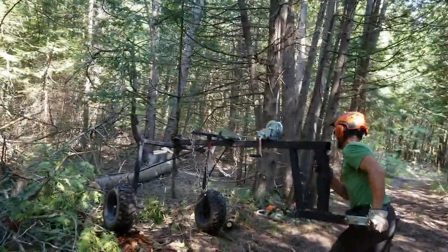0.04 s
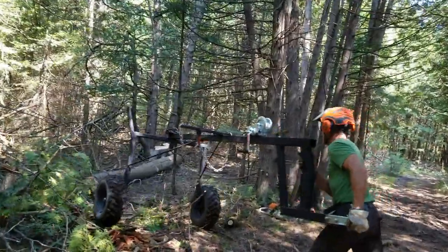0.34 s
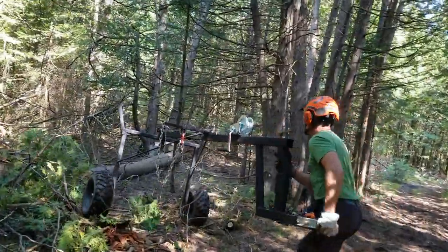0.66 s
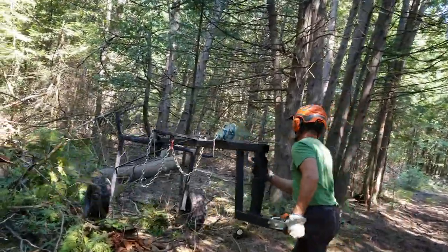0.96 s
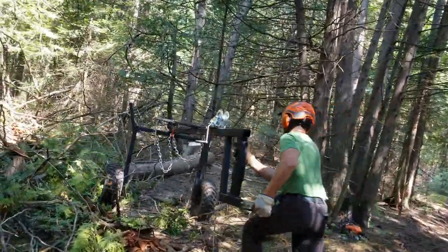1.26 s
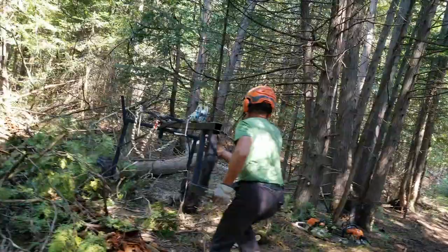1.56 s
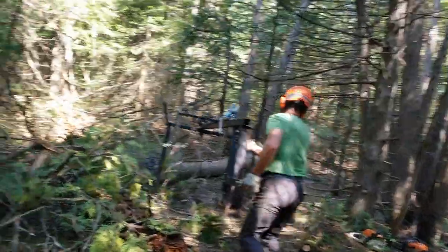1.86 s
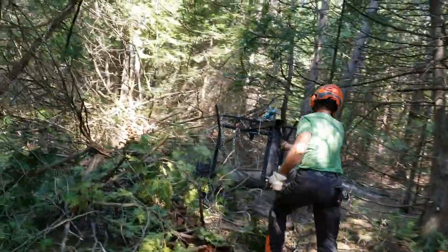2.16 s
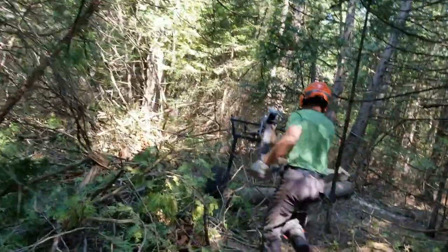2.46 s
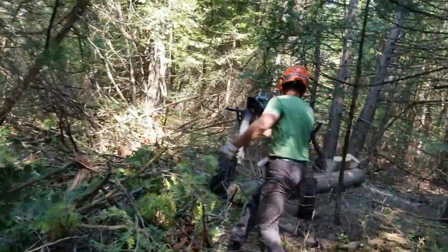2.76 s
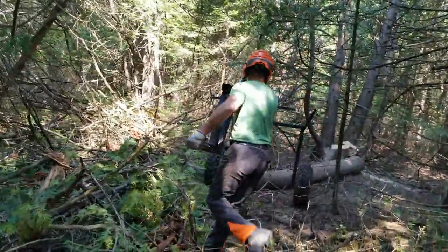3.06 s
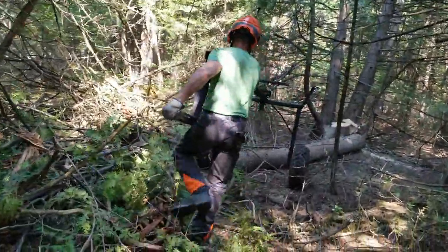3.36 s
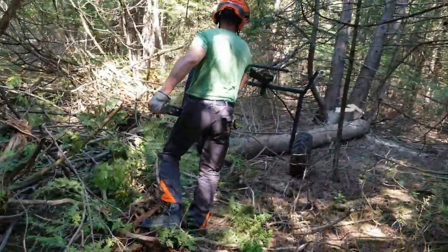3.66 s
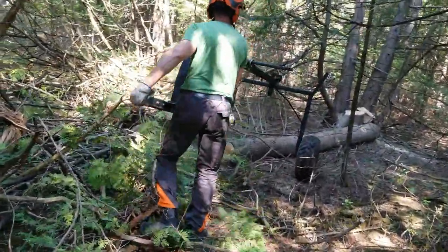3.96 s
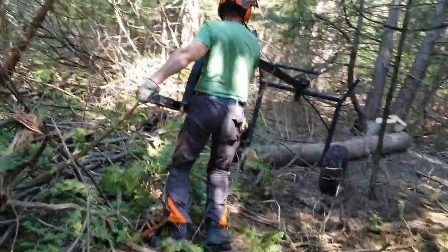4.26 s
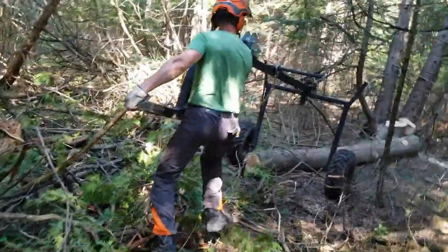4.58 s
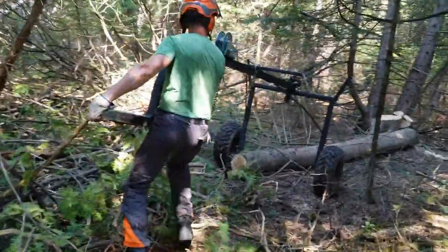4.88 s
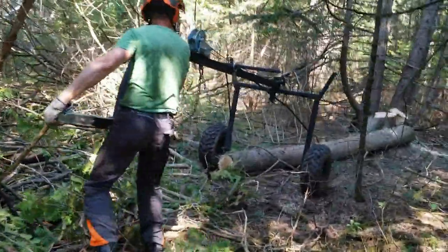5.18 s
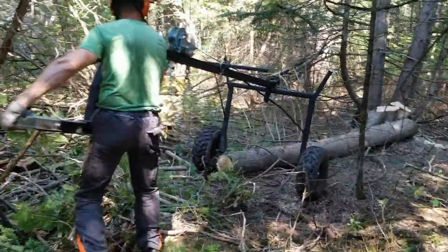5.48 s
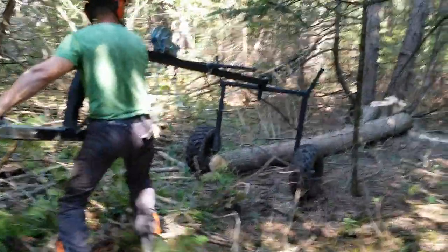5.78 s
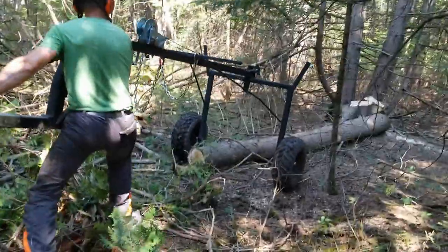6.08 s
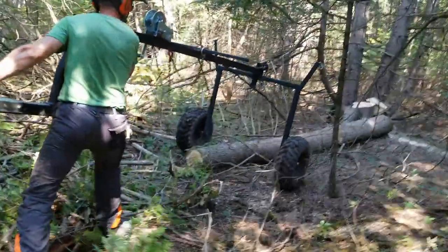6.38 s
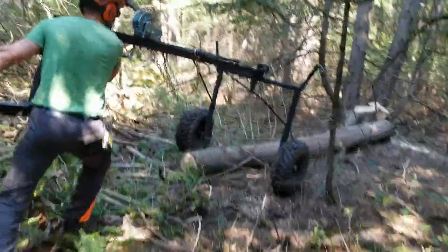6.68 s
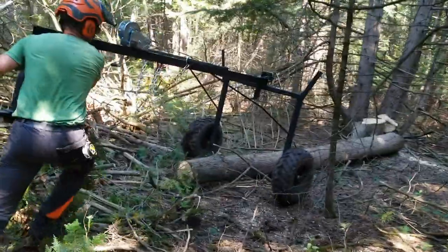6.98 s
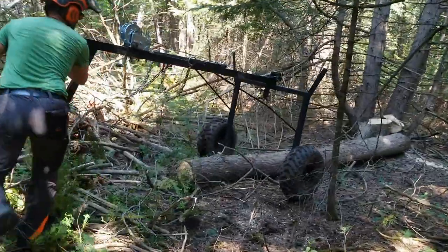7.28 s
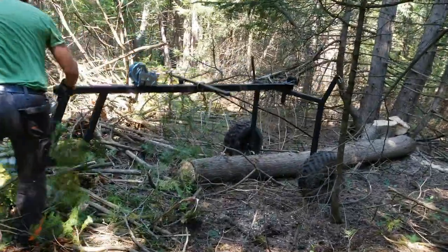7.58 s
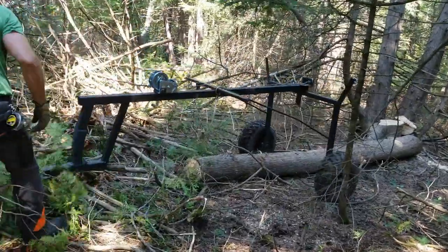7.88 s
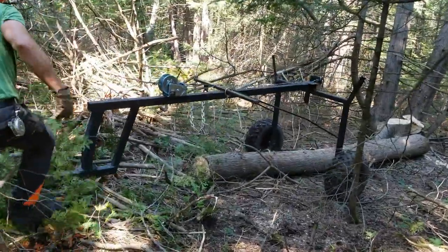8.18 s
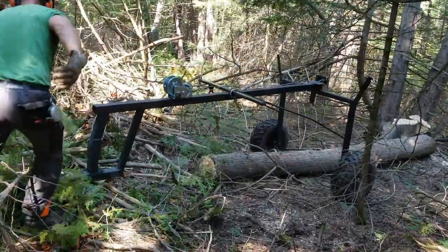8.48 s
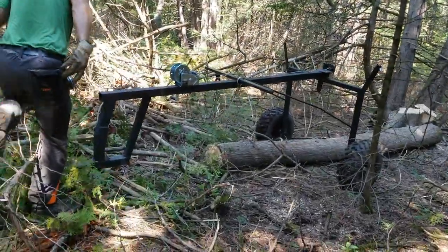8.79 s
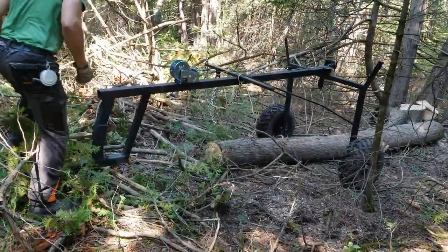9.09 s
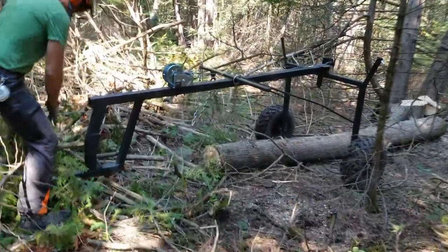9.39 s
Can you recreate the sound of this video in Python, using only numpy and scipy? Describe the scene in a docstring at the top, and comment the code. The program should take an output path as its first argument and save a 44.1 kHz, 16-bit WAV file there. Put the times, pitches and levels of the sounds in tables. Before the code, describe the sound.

A steel log carrier on small tyres is hauled over dry brush a few metres away in a quiet forest. Uneven footsteps rustle and crackle throughout, and the trees give each crack a short, wide echo. For the first two seconds twigs snap sharply over dull thuds, loudest with a wooden knock at about 1.3 seconds. From 2 to 4 seconds loose steel parts clank lightly and a small fitting gives a very high jingle, with a brief scrape over wood at 2.3. A stick creaks faintly at 4 seconds. Quieter steps, small snaps and knocks follow until about 6. Cracking builds again from 6.7, peaking near 7.6 with a wooden knock, a heavy crunch and another short scrape. Light clinks and jingles follow from 8 seconds, with a last few snaps and a clank around 9.

```python
"""A steel log carrier on two small tyres is hauled over dry brush, a few metres away among trees. Twigs snap
and crunch under boots and wheels, steps thud on the soil, and thick wood knocks. Loose parts clank on the
frame, a small steel chain jingles, and the frame scrapes over wood. A bent stick creaks once. The trunks
scatter every crack into a short, wide echo."""
import sys
import numpy as np
from scipy import signal
from scipy.fft import rfft, irfft, next_fast_len
from scipy.io import wavfile

SR = 44100
rng = np.random.default_rng(int(sys.argv[2]) if len(sys.argv) > 2 else 0)


def wrap_up_sound(samples):
    """Save the sound to the file named by the first command line argument, as 16-bit audio."""
    columns = np.atleast_2d(samples).T
    # keep every value between -1 and 1, then stretch to whole-number steps
    tamed = np.clip(columns, -1, 1)
    steps = np.round(tamed * 32767).astype(np.int16)
    wavfile.write(sys.argv[1], SR, steps)


N = 420713
TIME = np.arange(N) / SR
TOP_HZ = 15900  # upper limit of the treble

# Tone of the still air, the dry rustle and the scuffed soil. Each row: frequency in Hz, level in dB.
AIR_TONE = [(25, -4), (80, 0), (300, -21.5), (650, -14), (1700, -19.5), (4500, -12.5), (8300, -21.5),
            (15000, -29.5)]
RUSTLE_TONE = [(400, -19), (800, -5.5), (1700, -3), (2600, 1), (4800, 3.5), (6700, 0), (8300, -13.5),
               (11000, -5), (15500, -13)]
SOIL_TONE = [(30, -25.5), (70, -5.5), (150, 1), (400, -13), (750, -4.5), (1500, -22.5), (3000, -42.5)]
# Steps and heaves on the brush. Each row: moment of full weight in seconds, rustle level in dB,
# soil level in dB, easing-off time in seconds.
BRUSH_STEPS = [(.02, -50.5, -91, 0.034), (0.479, -51, -50.5, 0.069), (1.02, -46.5, -50.5, 0.51),
               (2.197, -46.5, -54.5, 0.26), (2.58, -73, -61, 0.48), (3.079, -51.5, -69.5, 0.21),
               (4.04, -55, -71, 0.082), (4.42, -57, -71, 0.23), (4.931, -42.5, -44.5, 0.03),
               (5.774, -54, -60.5, 0.06), (6.08, -55.5, -53.5, .1), (6.901, -47.5, -57, 0.17),
               (7.6, -37, -43.5, 0.093), (8.233, -44.5, -55.5, 0.042), (8.79, -52, -71, 0.074),
               (9.1, -50.5, -56.5, 0.21)]
# Larger twigs breaking. Each row: start in seconds, level in dB, pitch in Hz,
# breaking time in seconds, share sent to the echo in dB.
TWIG_SNAPS = [(.032, -42, 3240, 0.0013, -7), (.144, -35, 4120, 0.0017, -10),
              (.359, -18.5, 6000, 0.0018, -13.5), (.474, -40, 3230, .012, -27),
              (.599, -23, 6120, 0.00065, -11), (.709, -24, 4460, 0.0047, -10.5),
              (.978, -31, 3600, 0.03, -24), (1.2166, -23, 3490, 0.00098, -6.5),
              (1.259, -24.5, 5340, 0.0018, 3), (1.2815, -14, 3180, 0.0032, -12),
              (1.503, -19, 5550, 0.007, -11.5), (1.793, -29.5, 4100, 0.0051, -13.5),
              (1.822, -30.5, 4330, 0.039, -9), (1.996, -32.5, 4420, 0.0068, -4.5),
              (2.059, -21, 4260, 0.0026, -9.5), (2.293, -35, 3570, 0.042, 4.5),
              (2.324, -31, 4170, .039, -1), (2.618, -44, 3960, 0.00091, -29),
              (2.819, -39, 4260, 0.0016, -11), (4.262, -37.5, 5400, 0.0021, -12),
              (4.556, -42, 2870, .0038, -4.5), (4.728, -41, 2820, 0.0018, -4.5),
              (4.741, -32.5, 3880, 0.0016, -18), (4.94, -32, 5020, 0.0062, -33),
              (5.149, -39.5, 4480, 0.0022, -13), (5.378, -44.5, 4700, 0.0035, -6),
              (6.075, -30, 5000, 0.0072, -7), (6.4475, -34.5, 5080, .0025, -18.5),
              (6.68, -27.5, 4820, .0015, -7), (6.689, -15.5, 4180, 0.0021, -7.5),
              (6.926, -31.5, 5600, 0.0033, -22), (7.016, -38.5, 4500, 0.0046, -3),
              (7.136, -36.5, 4260, 0.0058, -3), (7.261, -25.5, 4950, 0.0016, -9),
              (7.277, -25, 4880, 0.014, -8.5), (7.311, -32, 4100, 0.0049, -5),
              (7.395, -32, 4500, 0.0085, -23), (7.5993, -17.5, 4100, 0.0025, -7),
              (7.61, -14, 4020, 0.0038, -14), (7.75, -23, 4150, .024, -9), (7.799, -28.5, 3780, 0.035, -7),
              (8.991, -26, 4760, 0.032, -7.5), (9.088, -33.5, 3970, .012, -6)]
# Echo of the trees, band by band. Each row: lower edge in Hz, level in dB.
ECHO_BANDS = [(90, -1.5), (400, 0.5), (1000, 0.5), (3200, 5), (5000, 5.5), (7500, 6), (11000, 5.5)]
# Needle-thin twigs parting. Each row: start in seconds, level in dB.
TWIG_TICKS = [(.1275, -43), (.3105, -38.5), (0.382, -34.5), (0.547, -38), (.965, -35.5), (1.066, -35),
              (2.546, -42), (2.696, -43), (2.791, -34.5), (3.3839, -44), (4.342, -49), (4.615, -49.5),
              (4.921, -32.5), (4.961, -54), (5.318, -48.5), (7.24, -32), (7.523, -46), (9.148, -35.5),
              (9.175, -38.5)]
# Loose steel hitting the frame. Each row: start in seconds, level in dB, pitch in Hz,
# rattling time in seconds.
FRAME_CLANKS = [(0.185, -43.5, 4640, .012), (2.112, -32, 4000, .02), (2.975, -35, 4170, 0.014),
                (3.135, -44.5, 4240, 0.033), (3.268, -48, 4380, 0.014), (3.43, -44.5, 4470, 0.016),
                (3.646, -49.5, 5400, 0.0026), (3.8, -35.5, 4180, 0.027), (4.177, -45, 6700, 0.006),
                (5.471, -44, 4880, 0.015), (6.074, -37.5, 4060, 0.01), (6.849, -39.5, 4450, 0.0066),
                (7.897, -39, 4920, 0.011), (7.992, -35, 4520, .011), (8.118, -43.5, 4940, .013),
                (8.268, -34.5, 4100, 0.0035), (8.427, -48.5, 4330, 0.0074), (8.537, -48, 4130, 0.015),
                (9.209, -29.5, 3740, 0.0046)]
# The frame's ringing tones. Each row: pitch in Hz, level in dB, seconds to fade by 60 dB.
FRAME_TONES = [(2260, 1, 0.24), (2467, 2.5, .38), (2645, -0.5, 0.35), (3330, -0.5, 0.15), (3900, -7, .28),
               (4240, -3.5, 0.27), (5160, 1, .18), (5820, -5, 0.23)]
# Thick branches and the log knocking. Each row: start in seconds, peak level in dB, pitch in Hz.
WOOD_KNOCKS = [(.476, -30.5, 834), (.711, -32, 860), (1.215, -19, 914), (1.648, -37, 755),
               (3.182, -39, 660), (3.528, -42.5, 794), (4.477, -37.5, 1230), (4.74, -30, 617),
               (4.874, -39, 420), (4.885, -38, 586), (5.7, -52, 404), (5.756, -40.5, 495),
               (7.529, -22.5, 670), (7.579, -27, 950)]
# Boots and tyres landing on soil. Each row: start in seconds, peak level in dB, pitch in Hz.
SOIL_THUDS = [(.711, -36, 159), (.881, -32.5, 155), (1.221, -32.5, 97), (1.284, -28.5, 210),
              (1.655, -42.5, 165), (2.117, -34, 114), (2.22, -35, 101), (2.25, -32.5, 107),
              (2.925, -37, 150), (4.442, -24.5, 70), (5.774, -37.5, 83), (7.609, -31.5, 230),
              (9.054, -40.5, 149)]
# Shakes of the small chain. Each row: start in seconds, level in dB.
CHAIN_SHAKES = [(1.967, -11), (2.03, -22), (2.11, -20), (2.204, -21.5), (2.792, -28), (2.964, -33),
                (3.09, -29), (3.134, -31), (3.215, -35), (3.264, -24.5), (3.64, -26.5), (7.987, -22.5),
                (8.203, -24.5), (8.604, -35), (8.776, -27.5)]
# The chain's ringing tones. Each row: pitch in Hz, level in dB, seconds to fade by 60 dB.
CHAIN_TONES = [(7980, -30, .15), (12050, -28, .15), (14520, -6, .18), (14662, -4, .16), (14712, -2, .24),
               (15510, -9, .2), (15568, -4, .22)]
# The frame scraping over wood. Each row: start in seconds, level in dB, length in seconds.
FRAME_SCRAPES = [(2.281, -29.5, 0.032), (2.319, -25, 0.038), (7.743, -29.5, 0.077)]
# The tones of its hollow tubes. Each row: pitch in Hz, level in dB, seconds to fade by 60 dB.
TUBE_TONES = [(743, -5, 0.13), (950, -17.5, 0.1), (1390, -1.5, 0.075), (1860, -8.5, 0.08),
              (5180, 3.5, 0.078)]
# Jerks of a bent stick. Each entry: start in seconds.
CREAK_STARTS = [3.96, 3.983, 4.007, 4.045, 4.082]


def undb(db):
    """Turn decibels into a number to multiply a sound by."""
    return 10 ** (np.asarray(db) / 20)


def unit(x):
    """Give each channel the same energy as 10 ms of sound at an average (rms) level of 1."""
    return x * np.sqrt(SR / 100 / (np.sum(x ** 2, axis=-1, keepdims=True) + 1e-18))


def band(x, lo_hz, hi_hz, order=2):
    """Keep the sound between two frequencies; a higher order cuts more sharply."""
    edges = np.clip([lo_hz, max(hi_hz, lo_hz * 1.05)], 10, [.46 * SR, .49 * SR])
    return signal.sosfilt(signal.butter(order, edges, "band", fs=SR, output="sos"), x)


def colour(x, tone):
    """Shape a sound with a tone table and set its average (rms) level to 1."""
    hz, db = np.transpose(tone)
    size = next_fast_len(x.shape[-1])
    freqs = np.maximum(np.fft.rfftfreq(size, 1 / SR), 1)
    gain = undb(np.interp(np.log(freqs), np.log(hz), db))
    shaped = irfft(rfft(x, size) * gain, size)[..., :x.shape[-1]]
    return shaped / shaped.std()


def stereo_noise(size, likeness):
    """Left and right noise: unrelated at likeness 0, the same at 1."""
    noise = rng.standard_normal((3, size))
    return np.sqrt(likeness) * noise[0] + np.sqrt(1 - likeness) * noise[1:]


def fade(size, t60):
    """A curve that falls by 60 dB every t60 seconds."""
    return np.exp(-np.log(1000) * TIME[:size] / t60)


def swell(power, t60):
    """The loudness of many rings added up, each dying away over t60 seconds."""
    keep = np.exp(-2 * np.log(1000) / (t60 * SR))
    return np.sqrt(signal.lfilter([1 - keep], [1, -keep], power + 1e-18))


def convolve(x, response):
    """Let every sample of x set off a copy of the response, keeping the length of x."""
    return signal.fftconvolve(np.atleast_2d(x), response, axes=1)[:, :x.shape[-1]]


def add(out, start, sound):
    """Mix a sound in at a start time in seconds."""
    i = int(start * SR)
    out[:, i:i + sound.shape[-1]] += sound[:, :max(N - i, 0)]


def volley(span, spread_db, count, size):
    """Uneven little kicks within span seconds, the first at once."""
    kicks, place = np.zeros(size), rng.random(count)
    force = undb(spread_db * rng.standard_normal(count))
    place[0], force[0] = 0, force.mean()
    samples = np.clip(place * span * SR, 0, size - 1).astype(int)
    np.add.at(kicks, samples, force * rng.choice([-1, 1], count))
    return kicks


def ring(tones, size):
    """Fading tones, struck a little differently each time and out of step between left and right."""
    out = 0
    for hz, db, t60 in tones:
        phase = 2 * np.pi * rng.random((2, 1))
        wave = np.sin(2 * np.pi * hz * TIME[:size] + phase)
        out = out + undb(db + 2 * rng.standard_normal()) * fade(size, t60) * wave
    return unit(out)


def random_tones(hz, t60, count):
    """Ringing tones scattered around hz, different for every piece."""
    return [(min(hz * 2 ** octaves, TOP_HZ), 0, t60) for octaves in rng.uniform(-0.81, .5, count)]


def grains(per_s, spread_db, likeness, t60):
    """Countless tiny contacts, mostly faint, a few strong, each with a short tail."""
    strength = undb(spread_db * np.minimum(rng.exponential(size=N), 4.5))
    contacts = rng.random(N) < per_s / SR
    return swell(contacts * strength ** 2, t60) * stereo_noise(N, likeness)


def air():
    """The still air of the wood is a faint, steady hush."""
    return undb(-62.5) * colour(stereo_noise(N, likeness=0.73), AIR_TONE)


def tread():
    """Weight builds with each step and eases off faster; gives the strength of rustle and scuffing."""
    power = undb([[-70], [-80]]) ** 2  # brush and soil settling between steps
    for peak_s, rustle_db, soil_db, ease_s in BRUSH_STEPS:
        press_s = 1.73 * ease_s
        weight = np.exp(-np.maximum((peak_s - TIME) / press_s, (TIME - peak_s) / ease_s))
        power = power + (undb([[rustle_db], [soil_db]]) * weight) ** 2
    return np.sqrt(power)


def undergrowth(rustle_gain, soil_gain):
    """Needles and leaves rustle and the finest twigs crackle, while soles and tyres scuff the soil."""
    leaves = colour(grains(per_s=240, spread_db=1.5, likeness=0.043, t60=0.098), RUSTLE_TONE)
    crackle = colour(grains(per_s=70, spread_db=4.4, likeness=.3, t60=.006), RUSTLE_TONE)
    soil = colour(grains(per_s=70, spread_db=1.4, likeness=1.0, t60=.08), SOIL_TONE)
    rustle = undb(1.5) * leaves + undb(-1) * band(crackle, 2200, TOP_HZ)
    return rustle * rustle_gain, soil * soil_gain


def twigs(breaks, size=4096):
    """Fibres give way in a rush, each kicking the stick into a brief ring; also gives the echo's share."""
    direct, to_echo = np.zeros((2, 2, N))
    for start, db, hz, span, echo_db in breaks:
        thickness = np.log2(4200 / hz)  # octaves below a medium stick
        fibres = volley(span, spread_db=4, count=9 if span < .01 else 45, size=size)
        tear_fade = fade(size, t60=0.0064) + 0.45 * fade(size, t60=0.05)
        tear = convolve(fibres, stereo_noise(size, likeness=0.3) * tear_fade)
        stick = unit(convolve(fibres, ring(random_tones(hz, t60=0.0065, count=4), size)))
        main_tone = unit(convolve(fibres, ring([(hz * .9, 0, .018)], size)))
        rip = unit(band(tear, hz * 0.65, hz * 1.574, order=3))
        crack = unit(rip + 0.72 * stick + undb(-5.5) * main_tone)
        # Thick sticks have more body and lie to the left; thin ones splinter and fizz on the right.
        body_noise = convolve(fibres, stereo_noise(size, likeness=0.5) * fade(size, t60=0.026))
        body = undb(-14.5 + 15.3 * thickness) * unit(band(body_noise, 660, 1990))
        fizz = undb(-11 - 16.5 * thickness) * unit(band(tear, 10500, 13100)) * undb([[-2], [2]])
        pan_db = thickness * np.array([[2], [-2]])
        snap = undb(db + pan_db) * (crack + body + fizz)
        add(direct, start, snap)
        add(to_echo, start, snap * undb(echo_db))
    return direct, to_echo


def tree_echo(sound):
    """Near trunks scatter the sound into a patchy spray; the deeper wood returns a faint, longer tail."""
    spray = stereo_noise(N, likeness=0.014)
    # Echoes that arrive close together strengthen some pitches and cancel others.
    cluster = stereo_noise(1024, likeness=.6) * fade(1024, t60=.04)
    spray = spray + convolve(spray, cluster / np.linalg.norm(cluster))
    patches_db = 3.6 * rng.standard_normal((2, N // 49 + 1))
    spray = spray * undb(np.repeat(patches_db, 49, axis=1)[:, :N])
    upper_edges = [hz for hz, db in ECHO_BANDS[1:]] + [TOP_HZ]
    out = 0
    for (lo_hz, db), hi_hz in zip(ECHO_BANDS, upper_edges):
        gathered = swell(band(sound, lo_hz, hi_hz, order=3) ** 2, t60=0.12) ** 2
        tail = np.hypot(swell(gathered, t60=0.23), undb(-4.5) * swell(gathered, t60=0.6))
        noise = band(spray, lo_hz, hi_hz, order=3)
        out = out + undb(db) * tail * noise / noise.std()
    return out


def thin_twigs(size=2048):
    """A needle-thin twig parts at once: one bright click with a brief quiver, each at its own pitch."""
    out = np.zeros((2, N))
    for start, db in TWIG_TICKS:
        hz = 3370 * 2 ** rng.uniform(-.4, .4)
        burst = stereo_noise(size, likeness=.4) * (fade(size, t60=0.0097) + .12 * fade(size, t60=.04))
        click = unit(band(burst, hz, 2 * hz)) + 0.8 * unit(band(burst, 2 * hz, TOP_HZ))
        add(out, start, undb(db) * unit(click))
    return out


def frame_clanks(size=22050, focus_db=13, detune=.012):
    """A loose steel part chatters on the frame and both ring; frame tones near its pitch ring most."""
    out = np.zeros((2, N))
    for start, db, hz, span in FRAME_CLANKS:
        contacts = volley(span, spread_db=4, count=8, size=size)
        build = np.sqrt(np.cumsum(contacts ** 2) / np.sum(contacts ** 2))  # each contact feeds the ring
        rattle = swell(contacts ** 2, t60=0.12) * stereo_noise(size, likeness=0.087)
        loose_part = unit(convolve(contacts, ring(random_tones(hz * 1.1, t60=0.091, count=20), size)))
        chatter = unit(band(rattle, hz * 0.8, hz * 1.43, order=3))
        chatter += undb(-16.5) * unit(band(rattle, 540, 1700)) + undb(-8.5) * unit(rattle)
        tones = []
        for tone_hz, tone_db, t60 in FRAME_TONES + FRAME_TONES:  # close pairs make the ring waver
            loss_db = focus_db * np.log2(tone_hz / hz) ** 2
            tones.append((tone_hz * rng.normal(1, detune), tone_db - loss_db, t60))
        frame = undb(1.5) * unit(build * ring(tones, size))
        add(out, start, undb(db) * (chatter + loose_part + frame))
    return out


def dull_blows(hits, rise_cycles, grit_db, grit_t60, size=8820):
    """A blow on wood or soil swings only a few times, with a gritty crumbling around its pitch."""
    out, t = np.zeros((2, N)), TIME[:size]
    for start, db, hz in hits:
        age = t * hz / rise_cycles
        swing = unit(age * np.exp(-age) * np.sin(2 * np.pi * hz * t))
        crumble = stereo_noise(size, likeness=0.95) * fade(size, grit_t60)
        blow = swing + undb(grit_db) * unit(band(crumble, hz * 0.33, hz * 1.85, order=3))
        add(out, start, undb(db) * blow / abs(blow).max())
    return out


def chain_jingles(size=13230, detune=.002, rise_s=.018):
    """A small steel chain shakes, its links bouncing quickly and building up a very high ring with a loose
    shimmer."""
    out = np.zeros((2, N))
    build = np.minimum(TIME[:size] / rise_s, 1)
    for start, db in CHAIN_SHAKES:
        bounces = unit(volley(span=.03, spread_db=3, count=7, size=size))
        rattle = swell(bounces ** 2, t60=.17) * stereo_noise(size, likeness=.5)
        shimmer = unit(band(rattle, 14520, 14880, order=3))
        tones = [(hz * rng.normal(1, detune), tone_db, t60) for hz, tone_db, t60 in CHAIN_TONES]
        clear_ring = unit(convolve(bounces, ring(tones, size)))
        tinkle = unit(build * (clear_ring + undb(-2.5) * shimmer))
        clicks = bounces * abs(rattle).max() / abs(bounces).max()
        chatter = unit(band(rattle + clicks, 3900, 20000, order=1))
        add(out, start, undb(db) * (tinkle + undb(-16.5) * chatter))
    return out * undb([[-7], [-2]])  # louder on the right


def frame_scrapes(size=13230, detune=0.0063):
    """The dragged frame sticks and slips over wood; the quick jerks keep its hollow tubes ringing."""
    out = np.zeros((2, N))
    for start, db, span in FRAME_SCRAPES:
        jerks = volley(span, spread_db=3, count=14, size=size)
        tubes = 0
        for hz, tone_db, t60 in TUBE_TONES:
            tone = ring([(hz * rng.normal(1, detune), 0, t60)], size)
            tubes = tubes + undb(tone_db) * unit(convolve(jerks, tone))
        add(out, start, undb(db) * unit(tubes))
    return out


def creak_breaks(first_db=-43.5, loss_db=0.75, hz=2960, span=.002, echo_db=-13):
    """A bent stick creaks in small breaks of fibres, each weaker than the last; gives rows for twigs()."""
    return [(start, first_db - loss_db * k, hz, span, echo_db) for k, start in enumerate(CREAK_STARTS)]


def scene():
    """The carrier, the brush and the ground, with their echo among the trees and the still air."""
    snaps, snaps_to_echo = twigs(TWIG_SNAPS + creak_breaks())
    ticks = thin_twigs()
    rustle, scuffs = undergrowth(*tread())
    steel = frame_clanks() + frame_scrapes()
    thuds = dull_blows(SOIL_THUDS, rise_cycles=0.56, grit_db=-1.5, grit_t60=0.17)
    knocks = dull_blows(WOOD_KNOCKS, rise_cycles=1.0, grit_db=1.5, grit_t60=0.084)
    ground = thuds + knocks + scuffs
    to_echo = snaps_to_echo + undb(-9) * ticks + undb(-11.5) * (steel + rustle) + undb(-16) * ground
    echo = tree_echo(to_echo)
    return snaps + ticks + steel + chain_jingles() + rustle + ground + echo + air()


def record(dry):
    """Two microphones: the left is nearer and louder; both lose deep bass and dip in the upper treble."""
    left = dry[0] * undb(1.1)
    right = np.pad(dry[1], (4, 0))[:N] * undb(-1.1)  # arrives 4 samples later
    mics = np.array([left, right])
    mics = mics - 0.58 * band(mics, 7000, 9250, order=1)
    mics = signal.sosfilt(signal.butter(2, 35, "high", fs=SR, output="sos"), mics)
    mics = np.tanh(mics)  # rounds the sharpest cracks
    treble_cut = signal.ellip(8, .2, 70, TOP_HZ, fs=SR, output="sos")
    return signal.sosfilt(treble_cut, mics)


dry = scene()
out = record(dry)
wrap_up_sound(out)
```